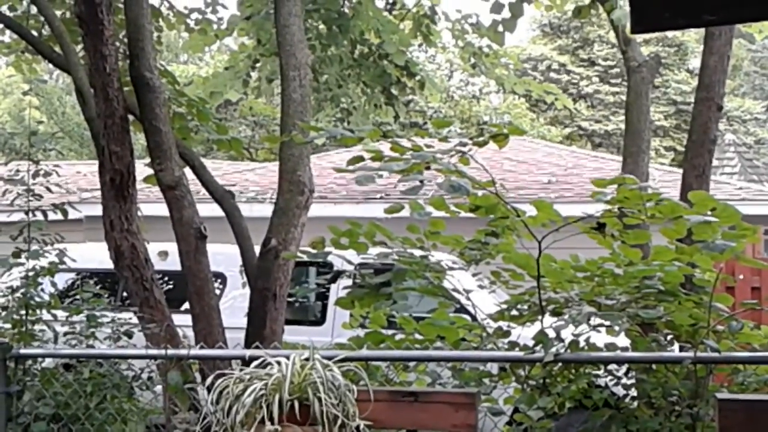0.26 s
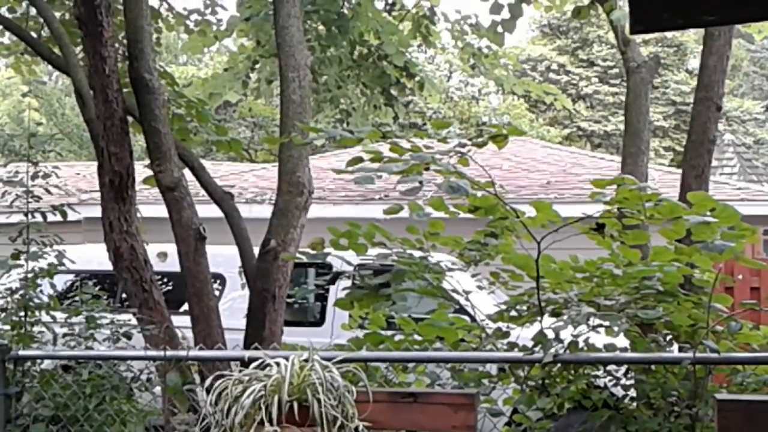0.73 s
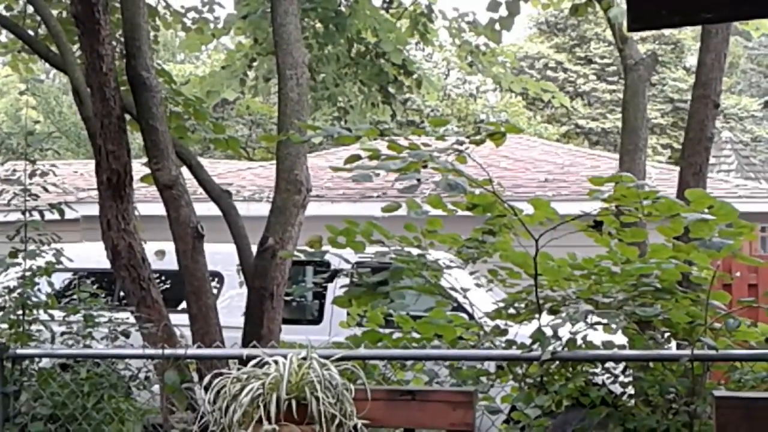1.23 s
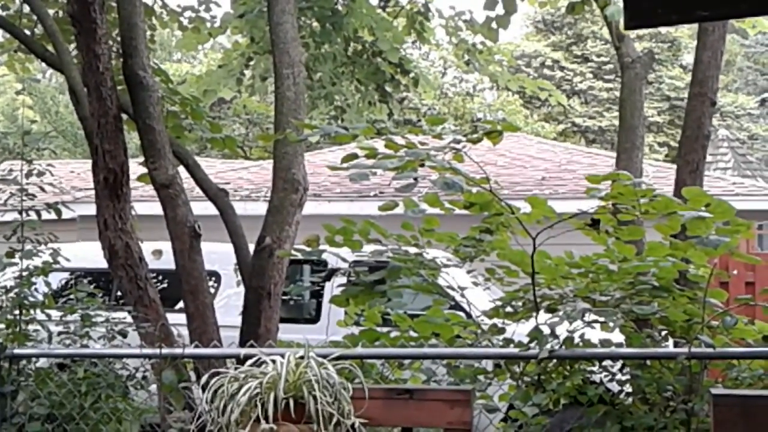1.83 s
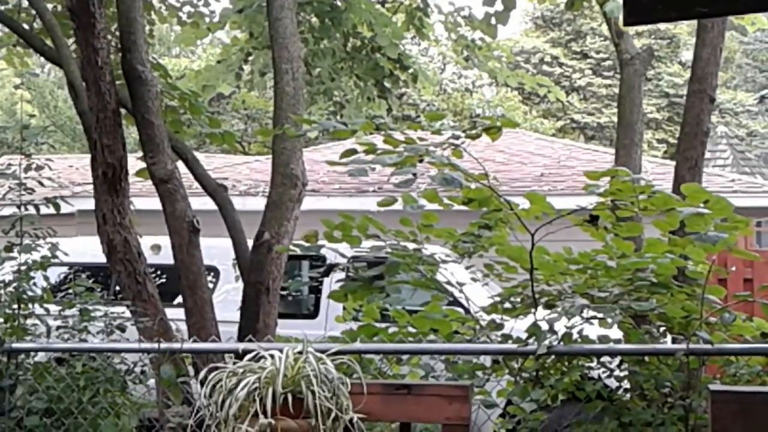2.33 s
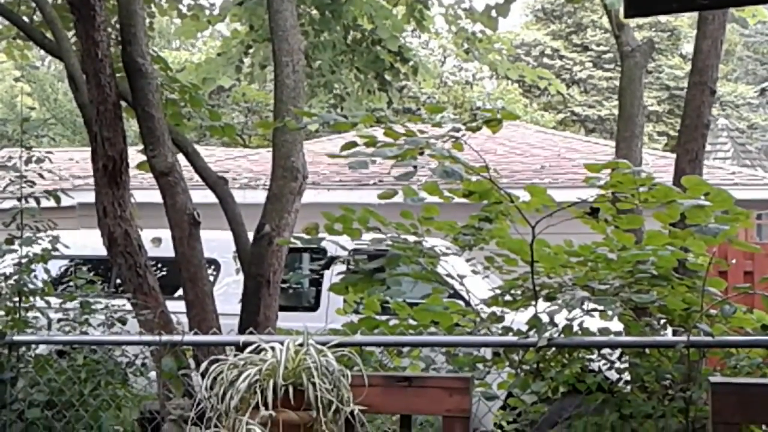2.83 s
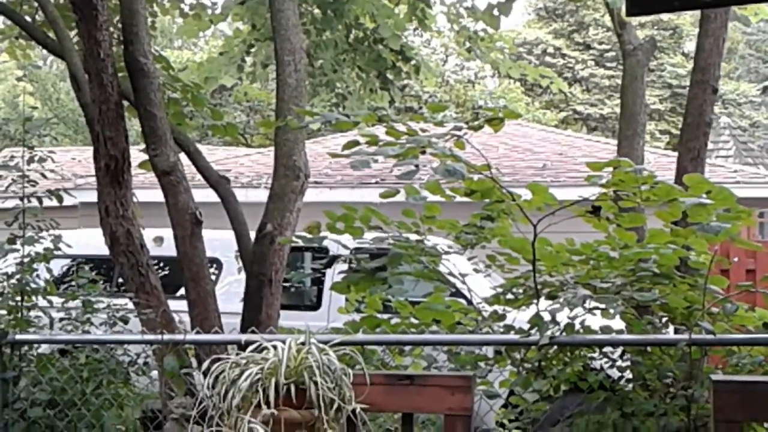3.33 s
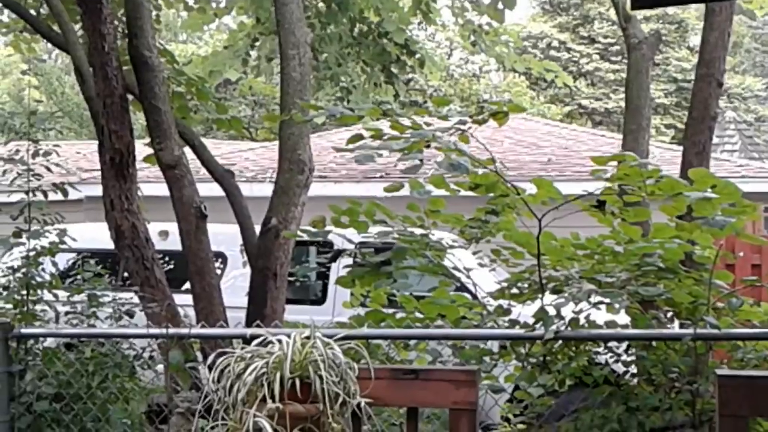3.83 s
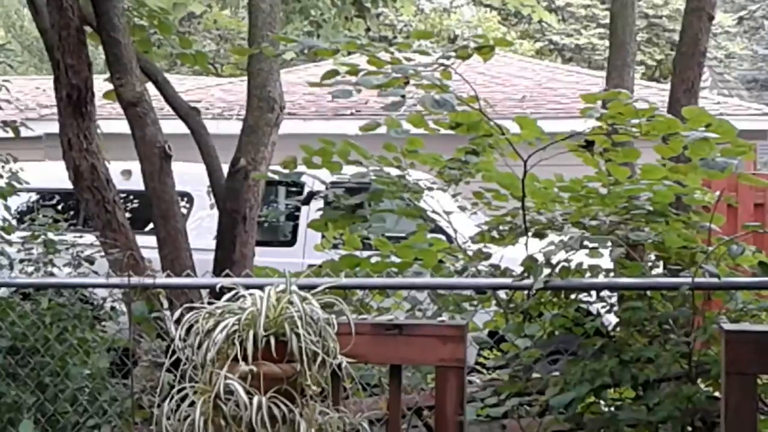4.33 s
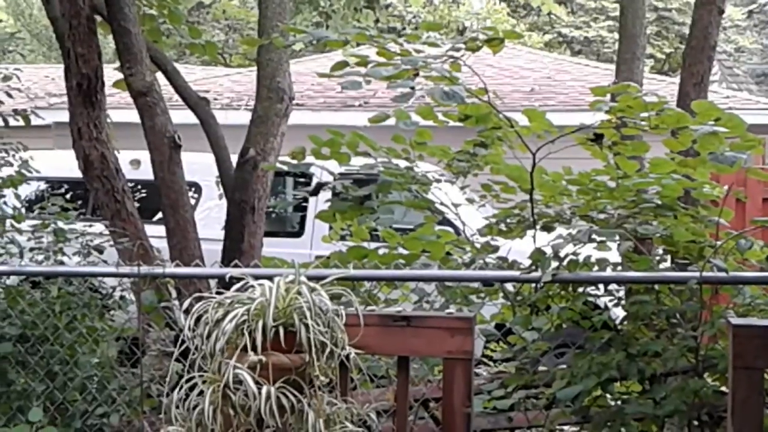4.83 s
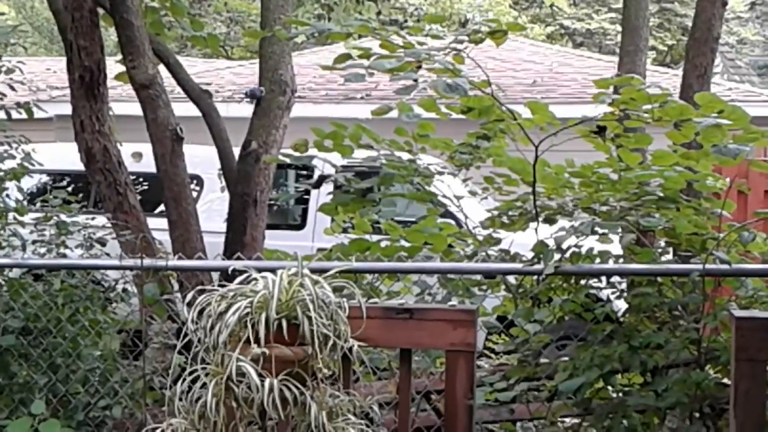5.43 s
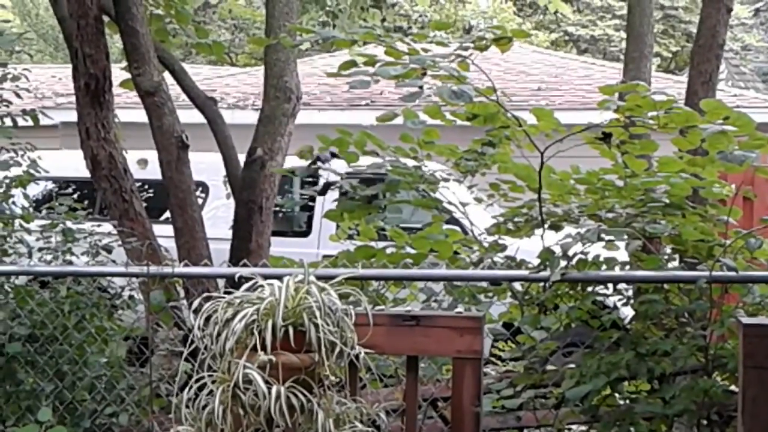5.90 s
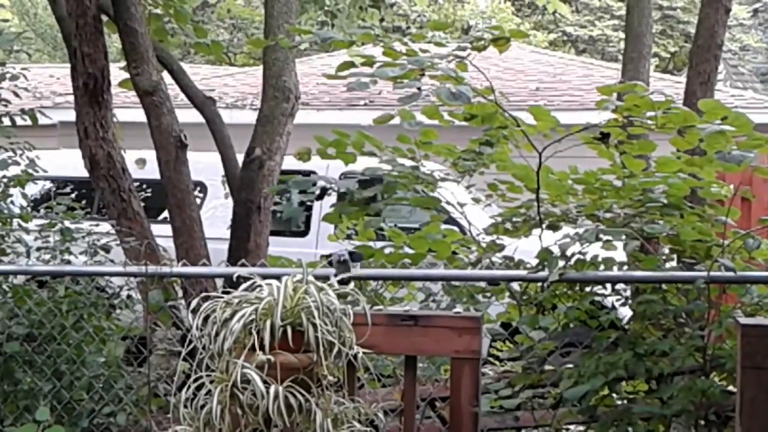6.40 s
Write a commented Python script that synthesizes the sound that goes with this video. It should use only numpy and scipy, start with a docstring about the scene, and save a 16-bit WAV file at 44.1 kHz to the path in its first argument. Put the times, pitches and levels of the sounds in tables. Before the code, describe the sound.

A backyard with trees and house walls, heard over a steady soft bed of low distant traffic, leaves, a faint high insect shimmer mainly on the right, and hiss. From 0.1 s a near jay, on the right, mutters faint squeaky notes at about 0.8, 1.15, 1.4 and a stronger one at 1.75. Small birds make tiny high whistles around 0.4-0.6 s. At 2.4 s sharp ticks and a dense scratchy scuffle break out, then at 2.7 s one loud, harsh yelp, a croak under it, echoing off walls and trunks. Squeaky mutters continue around 3.0-3.5 s, with a clipped note and ticks near 3.9 s. The left side is muffled until about 4.2 s, when it opens clearly. Thin whistles follow to 4.8 s, then mostly the bed, with faint scuffles and ticks at 6.3 and 6.6 s.

```python
"""A jay close on the right mutters short squeaky notes, gliding harmonic stacks; small birds whistle further off.
At 2.4 s beak or claws tick and scuffle as scratches of noise, then comes one loud yelp, a croak an octave under it.
More mutters follow; near 4.2 s the covered left microphone port comes mostly free. Whistles and scuffles go on.
House walls and trees echo the birds as decaying noise. Filtered noise gives the steady bed throughout:
distant traffic and leaves, an insect chorus and microphone hiss."""
import sys
import numpy as np
from scipy import signal
from scipy.fft import rfft, irfft
from scipy.io import wavfile
from scipy.ndimage import uniform_filter1d

SR = 44100
rng = np.random.default_rng(int(sys.argv[2]) if len(sys.argv) > 2 else 0)


def int16_out(signal):
    """Quantize to a 16-bit WAV file."""
    q = np.round(np.clip(np.atleast_2d(signal).T, -1, 1) * 32767)
    wavfile.write(sys.argv[1], SR, q.astype(np.int16))


N = 293706  # samples


def undb(db):
    """Amplitude factor of a level in dB."""
    return 10 ** (np.asarray(db) / 20)


def level(x, db):
    """Bring a signal to an RMS level in dB."""
    return x * undb(db) / np.sqrt(np.mean(x ** 2))


def on_log(table, hz):
    """Read a spectrum table on a log-frequency axis."""
    table_hz, values = np.transpose(table)
    return np.interp(np.log(np.maximum(hz, 1)), np.log(table_hz), values)


def colour(x, table):
    """Filter by a table of hz, gain_db."""
    hz = np.arange(len(x) // 2 + 1) * SR / len(x)
    return irfft(rfft(x) * undb(on_log(table, hz)), len(x))


def butter(kind, order, hz, x):
    """Butterworth filter with edges in Hz."""
    return signal.sosfilt(signal.butter(order, hz, kind, fs=SR, output="sos"), x)


def walk(rate_hz):
    """Random values held for one period of the rate and smoothed twice; spread about 0.8."""
    held = int(SR / rate_hz)
    steps = np.repeat(rng.standard_normal(N // held + 1), held)
    return 1.04 * uniform_filter1d(uniform_filter1d(steps, held), held)[:N]


def span(table, edge_s):
    """Samples that a table covers, its columns at each sample, and soft ends."""
    s, *columns = np.transpose(table)
    i = np.arange(int(s[0] * SR), min(int(s[-1] * SR), N))
    fade = np.clip(np.minimum(i - i[0], i[-1] - i) / (edge_s * SR), 0, 1)
    return i, [np.interp(i / SR, s, c) for c in columns], np.sin(np.pi / 2 * fade) ** 2


def swell(start_s, rise_s, fall_s, peak_db, drop_db):
    """Samples of an event, its course (0 start, 1 peak, 2 end) and gain: smooth rise, steady decay, soft end."""
    i = np.arange(int(start_s * SR), min(int((start_s + rise_s + fall_s) * SR), N))
    course = np.interp(i / SR - start_s, [0, rise_s, rise_s + fall_s], [0, 1, 2])
    rise = np.sin(np.pi / 2 * np.minimum(course, 1)) ** 2
    decay = undb(peak_db - drop_db * np.maximum(course - 1, 0))
    end = np.clip((i[-1] - i) / (.004 * SR), 0, 1)
    return i, course, rise * end * decay


def yard(shared_db=-62, spread_db=0.52):
    """Distant traffic and leaves: steady coloured noise, its level drawn once, its bass most alike at both ports."""
    # spectrum of the bed: hz, relative_density_db
    bed = [(15, -45), (25, -20), (56, -1), (96, -5), (129, -3), (194, -7.5), (298, -11.5), (525, -16.5),
           (809, -15), (925, -17), (2510, -26.5), (3200, -30), (4400, -29), (5800, -34), (15700, -37.5)]
    # part that differs between the ports: hz, level_against_shared_part_db
    unshared = [(60, -10), (110, -7), (200, -5), (380, -1), (700, -3), (1290, 1), (2380, 0.5), (4400, 1),
                (8120, -1), (15000, 0)]
    # balance of the ports: hz, left_minus_right_db
    balance = [(60, -1), (110, 0), (200, -1.5), (380, -0.5), (700, 1), (1290, 1), (2380, 0), (4400, -1),
               (8120, -2.5), (15000, -2.5)]
    mid, side = (colour(rng.standard_normal(N), bed) for _ in range(2))
    side = colour(side, unshared)
    gain = undb(shared_db + spread_db * rng.standard_normal()) / np.std(mid)
    return gain * np.array([colour(mid + side, balance), mid - side])


def insects(low_hz=4070, high_hz=4920, left_db=-83, right_db=-73, swell_db=0.3, shimmer_db=3.0):
    """A distant chorus: noise in one steep-edged band, both ports swelling and shimmering together."""
    band = level(butter("band", 3, [low_hz, high_hz], rng.standard_normal((2, N))), 0)
    return band * undb(np.array([[left_db], [right_db]]) + swell_db * walk(3) + shimmer_db * walk(25))


def echo(x, db, first_s=0.008, patchy_db=2.0, early_s=0.082, late_db=-5):
    """Walls and trunks scatter the sound back in clumps; each octave dies at its own rate."""
    # late decay of the surroundings: hz, t60_s
    decay = [(500, 1.0), (1200, 1.26), (2500, 1.14), (5000, 1.85), (9000, 1.64)]
    # tint of the surroundings: hz, gain_db
    tint = [(400, -0.5), (850, 2.5), (1050, 0.5), (1300, 8), (1550, -1), (2100, -2.5), (2600, 0), (3300, 4),
            (4500, 5.5), (8000, 17.5)]
    t = np.arange(SR * 3 // 2) / SR
    tail = 0
    for hz in 250 * 2. ** np.arange(6):
        edges_hz = [hz / np.sqrt(2), hz * np.sqrt(2)]
        octave = butter("band", 2, edges_hz, rng.standard_normal(len(t)))
        tail = tail + octave * np.exp(-np.log(1000) * t / on_log(decay, hz))
    # near surfaces answer first and strongest
    tail = tail * (np.exp(-t / early_s) + undb(late_db))
    # silent up to first_s, then rising over as long again
    tail = tail * np.clip(t / first_s - 1, 0, 1) * undb(patchy_db * walk(69.0)[:len(t)])
    tail = tail / np.sqrt(np.sum(tail ** 2))
    return undb(db) * signal.fftconvolve(colour(x, tint), tail)[:N]


def whistles(flicker_db=4, waver=0.013, drop_db=11.5):
    """Small birds: near sines with a faint octave, flickering through moving leaves and air; direct sound and echo send."""
    # whistles and squeaks: start_s, rise_s, fall_s, peak_rms_db before flicker, start_pitch_hz,
    # peak_pitch_hz, end_pitch_hz, octave_against_note_db, echo_send_against_direct_db
    calls = [(0.386, .01, 0.028, -53, 3910, 4130, 4150, -28, -12),
             (.41, 0.014, 0.016, -47, 4130, 3820, 3800, -29, -9.5),
             (.437, 0.016, 0.03, -52, 3850, 3520, 3650, -17, -11.5),
             (.565, 0.016, 0.017, -50.5, 3764, 3630, 3460, -19, -11),
             (.592, 0.0049, .016, -52.5, 3520, 3540, 5700, -21, -15),
             (2.423, 0.0046, 0.0073, -50.5, 5230, 4800, 5100, -34, -16),
             (2.452, 0.023, 0.033, -61, 5250, 5500, 5650, -38, -15),
             (2.92, .011, 0.013, -50, 4375, 4140, 4280, -57, -12),
             (3.125, 0.0076, .016, -56, 4080, 4200, 4000, -22, -9),
             (3.826, 0.013, 0.017, -55.5, 4140, 4450, 4800, -38, -12),
             (4.068, .007, .014, -54.5, 4020, 4040, 5100, -35, -23),
             (4.088, 0.0071, 0.027, -63, 5100, 4800, 5400, -38, -13),
             (4.372, 0.016, .012, -67.5, 3240, 3550, 3100, -35, -5),
             (4.392, 0.0118, .03, -55, 3190, 2580, 2450, -35, -6),
             (4.685, 0.012, 0.02, -63.5, 2600, 2820, 3000, -37, -2),
             (4.71, 0.015, 0.028, -63, 3440, 3360, 2900, -35, -4),
             (4.738, 0.014, 0.036, -55, 2930, 2600, 2460, -35, -3),
             (6.284, .004, 0.081, -70, 7150, 6950, 7200, -35, -16)]
    out, pitch = np.zeros((2, N)), 1 + waver * walk(250)
    for start_s, rise_s, fall_s, db, *hz, octave_db, echo_db in calls:
        i, course, gain = swell(start_s, rise_s, fall_s, db, drop_db)
        glide_hz = np.interp(course, range(3), hz) * pitch[i]
        phase = 2 * np.pi * np.cumsum(glide_hz) / SR
        tone = np.sin(phase) + undb(octave_db) * np.sin(2 * phase)
        out[:, i] += undb([[0], [echo_db]]) * gain * tone
    return np.sqrt(2) * out * undb(flicker_db * walk(200))


def scuffles(grain_db=3.0, flutter_db=1.0, split_hz=2200, drop_db=9):
    """Wings and claws: dense scratches of very unequal size, in flurries; dull and bright parts flutter apart."""
    # flurries: start_s, rise_s, fall_s, dull_part_peak_db before flutter, bright_against_dull_db
    flurries = [(2.4, 0.0069, 0.018, -58.5, 10), (2.422, 0.032, 0.016, -44.5, 3.5),
                (2.46, 0.01, 0.043, -42, -2), (2.5, 0.023, 0.08, -49, -14), (3.698, .012, .035, -72, 12),
                (3.872, 0.0046, 0.03, -65, 12), (3.93, .011, 0.036, -67.5, 5),
                (6.278, .004, 0.018, -65, -2), (6.295, 0.042, 0.084, -63.5, 1),
                (6.535, 0.024, .035, -62.5, -6), (6.584, 0.011, 0.035, -62, 0.5)]
    # spectrum of the scratches: hz, relative_density_db
    scratch = [(120, -48), (200, -4.5), (266, -2), (423, -14), (488, -1), (866, -4.5), (1210, 1.5),
               (1310, -2), (2180, -14.5), (3750, -13), (4680, -27), (5490, -28), (6040, -40.5),
               (9000, -48.5), (11700, -67.5), (19800, -120)]
    grains = rng.standard_normal(N) * undb(grain_db * rng.exponential(size=N))
    rustle = colour(grains, scratch)
    dull = level(butter("low", 3, split_hz, rustle), 0) * undb(flutter_db * walk(90))
    bright = level(butter("high", 3, split_hz, rustle), 0) * undb(flutter_db * walk(90))
    out = np.zeros(N)
    for start_s, rise_s, fall_s, db, bright_db in flurries:
        i, _, gain = swell(start_s, rise_s, fall_s, db, drop_db)
        out[i] += gain * (dull[i] + undb(bright_db) * bright[i])
    return out


def ticks():
    """Beak or claw ticks: each a decaying crack of noise passed twice through one resonance."""
    # ticks: start_s, peak_db, ring_hz, ring_width_hz of one pass, crack_decay_s
    cracks = [(2.3974, -39, 5040, 6100, 0.00068), (2.401, -39, 4230, 1500, .003),
              (2.406, -32.5, 3470, 700, 0.0044), (2.406, -40.5, 494, 400, 0.0039),
              (2.41, -46.5, 1950, 250, 0.0048), (2.426, -38, 3800, 900, .002),
              (2.427, -42.5, 694, 900, 0.0019), (3.858, -39, 2080, 933, 0.0026),
              (3.868, -38.5, 2350, 2520, 0.0034), (6.314, -44, 1500, 1500, 0.0022),
              (6.594, -41, 2200, 1200, 0.0045)]
    out, t = np.zeros(N), np.arange(SR // 30) / SR
    for s, db, hz, width_hz, crack_s in cracks:
        crack = rng.standard_normal(len(t)) * np.exp(-t / crack_s)
        ring = signal.iirpeak(hz, max(hz / width_hz, .3), SR)
        tick = signal.lfilter(*ring, signal.lfilter(*ring, crack))
        out[int(s * SR):][:len(t)] += undb(db) * tick / abs(tick).max()
    return out


def jay(wobble=0.0074, rasp_hz=450, drive=0.97, spread=0.62, count=8):
    """The syrinx gives a gliding harmonic stack, coloured by the throat; uneven cycles smear partials into noise."""
    # notes: roughness (0-1), then rows of time_s, pitch_hz, level_db before the throat,
    # first_partial_db against that level, brightness_db_per_octave above the second partial
    notes = [ (0.096, [(.105, 680, -78.5, -10, 12), (.125, 860, -59.5, -15, 13), (.14, 930, -54.5, -15, 9),
             (.17, 950, -65, -15, 14), (.25, 965, -80, -10, 17)]), (0.097, [(.79, 752, -63, -2, 8),
             (.797, 778, -52.5, 9, 14), (.812, 832, -48.5, 11, 4.5), (.83, 917, -47.5, -1.5, 3),
             (.85, 882, -64.5, 22, 2)]), (0.052, [(1.138, 1040, -57, 15, 7), (1.152, 1030, -34.5, -4.5, -4),
             (1.163, 1075, -38.5, -11, -5), (1.176, 1234, -38, -3.5, 12.5), (1.19, 1345, -43.5, -6.5, 10),
             (1.205, 1350, -45.5, 1, -7)]), (0.25, [(1.375, 1000, -56, -18, -10),
             (1.382, 944, -49.5, -20, -17), (1.395, 850, -43.5, -8, -13), (1.408, 700, -68, 32.5, -2),
             (1.425, 690, -79, 5, 0)]), (0.1, [(1.73, 938, -62.5, -4.5, -10), (1.75, 996, -46.5, 3, -12),
             (1.768, 1107, -37, -15, -6), (1.78, 1114, -53.5, -3.5, 7), (1.79, 1280, -28.5, 4, -18)]),
             (0.054, [(2.688, 1278, -53, 3, -8), (2.7, 1236, -39.5, 6, -1.5), (2.715, 1152, -22, -7.5, -15),
             (2.724, 1080, -20.5, -13.5, -9), (2.73, 1050, -21.5, -5, -9), (2.735, 1039, -16, -4, -9),
             (2.744, 1071, -20.5, -13, -16), (2.75, 1192, -25, -1.5, -13), (2.768, 1186, -24, -0.5, -9),
             (2.79, 1228, -27, 2, -12)]), (0.4, [(2.734, 548.4, -27, -15, -1),
             (2.745, 576.4, -26.5, -4, -2), (2.756, 598.6, -25, -9, -3), (2.768, 604, -27, -10, -2.5),
             (2.785, 615, -31.5, -9.5, -0.5)]), (0.097, [(2.95, 787.5, -60, 6, 10),
             (2.97, 875, -47.5, 16, 7), (2.986, 958, -61.5, 24.5, 7), (3.005, 1053, -48.5, 23, -7)]),
             (0.05, [(3.015, 915, -55, 8, -2), (3.03, 917.5, -35.5, -12, -17), (3.049, 832, -41, 8, -12),
             (3.07, 848, -37.5, 17, -21), (3.095, 901, -31, 2.5, -26), (3.105, 955, -45, -3, 4),
             (3.125, 1003, -32, 3, -1), (3.14, 1086, -37, 1, -7), (3.15, 1240, -50.5, 20.5, -10),
             (3.18, 1172, -49, -6, -7)]), (0.16, [(3.32, 530, -34, -2, -14), (3.332, 566, -42, 13.5, -18),
             (3.345, 628, -47, 16.5, 1.5), (3.37, 636, -50, 8, 6.5), (3.398, 629, -46.5, 7.5, -8),
             (3.415, 665, -44.5, 12, -23), (3.45, 631, -51, -10, 0), (3.49, 644, -56, 19, 0),
             (3.507, 683, -55, 16.5, -10), (3.53, 815, -44.5, -5, -22)]), (0.2, [(3.856, 987, -50, 1, -3),
             (3.863, 980, -39.5, -3, -2), (3.872, 776, -62, 16, 18), (3.885, 728, -65.5, 22, 8),
             (3.9, 685, -69, 3, 3)]), ]
    # how windpipe and beak colour the partials: hz, gain_db
    throat = [(550, -21), (850, -8), (1150, -12), (1700, -7), (2150, -0.5), (2600, -6.5), (3200, -18.5),
              (4200, -29.5), (5400, -40.5), (6500, -60), (9000, -100)]
    out, pitch = np.zeros(N), 1 + wobble * walk(150)
    rasp = level(butter("low", 4, rasp_hz, rng.standard_normal((2, N))), 0)
    for rough, note in notes:
        i, (hz, db, first_db, bright), fade = span(note, .005)
        phase = 2 * np.pi * np.cumsum(hz * pitch[i]) / SR
        for k in range(1, count + 1):
            # the higher the partial, the more an uneven cycle throws it off
            share = np.clip(rough * k ** spread, 0, 1)
            smear = rasp[0, i] * np.sin(k * phase) + rasp[1, i] * np.cos(k * phase)
            tone = np.sqrt(2 - 2 * share ** 2) * np.sin(k * phase) + share * smear
            lift_db = first_db if k == 1 else bright * np.log2(k / 2)
            out[i] += fade * undb(db + on_log(throat, k * hz) + lift_db) * tone
    # at full effort the membranes slap shut, which adds faint high partials
    return np.tanh(drive * out) / drive


def covered_port(birds, bed, leak_db=-31, leak_hz=2600, open_db=-5.5):
    """Left port: its cover lets little of the birds through, only dull sound, and recolours the bed until it opens."""
    # cover's effect on the bed: hz, gain_db
    cover = [(60, -3), (500, -5.5), (1500, -8), (2800, -3), (4500, -15.5), (5800, 1), (15000, 1)]
    # opening of the port: time_s, share_open (0-1)
    opening = [(4.155, 0.043), (4.175, 0.92)]
    uncovered = np.interp(np.arange(N) / SR, *np.transpose(opening))
    leak = undb(leak_db) * butter("low", 3, leak_hz, birds)
    muffled = leak + colour(bed, cover)
    free = undb(open_db) * birds + bed
    return (1 - uncovered) * muffled + uncovered * free


def scene():
    """Birds with their echoes over the bed, at a covered left port and a free right one."""
    left_bed, right_bed = yard() + insects()
    far, far_send = whistles()
    near = ticks() + scuffles()
    voice = jay()
    direct = voice + far + near
    send = voice + far_send + undb(-16) * near
    left = covered_port(direct + echo(send, -1.5), left_bed)
    right = direct + echo(send, -5.0) + right_bed
    return np.array([left, right])


def record(dry, hiss_db=-79, top_hz=15750):
    """The microphones add white hiss behind the cover and the recorder cuts the top."""
    hiss = undb(hiss_db) * rng.standard_normal(dry.shape)
    top_cut = signal.ellip(10, .2, 60, top_hz, fs=SR, output="sos")
    return signal.sosfilt(top_cut, dry + hiss)


dry = scene()
out = record(dry)
int16_out(out)
```